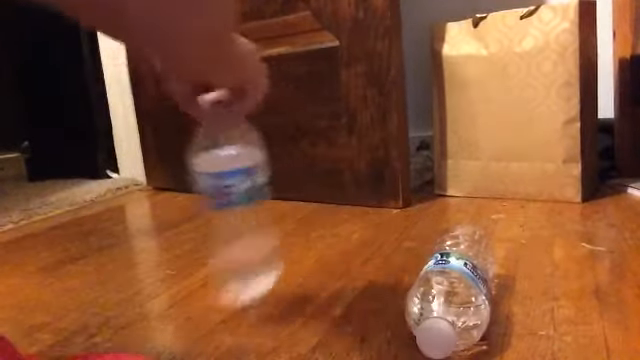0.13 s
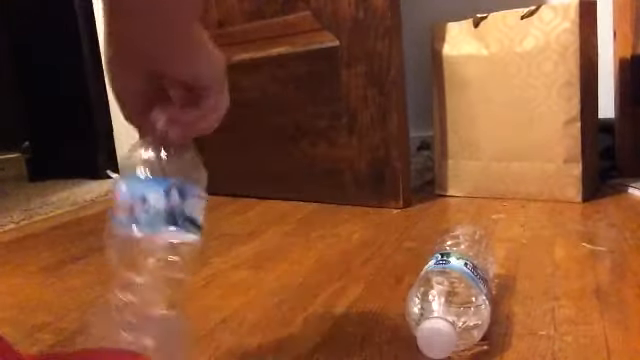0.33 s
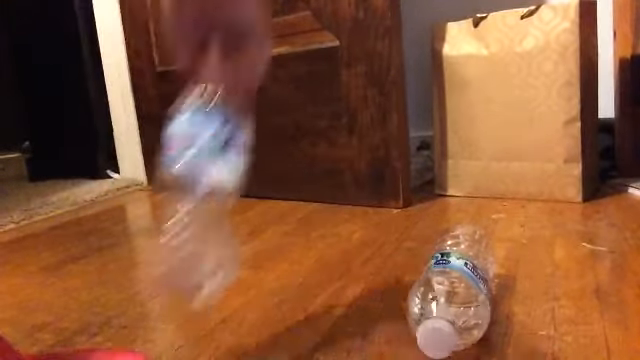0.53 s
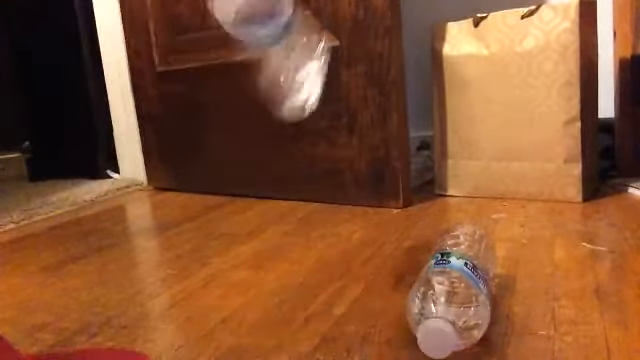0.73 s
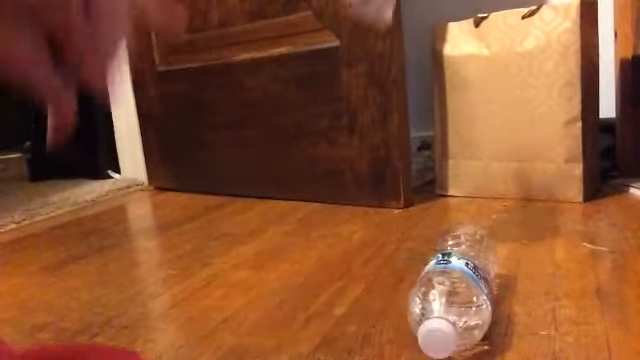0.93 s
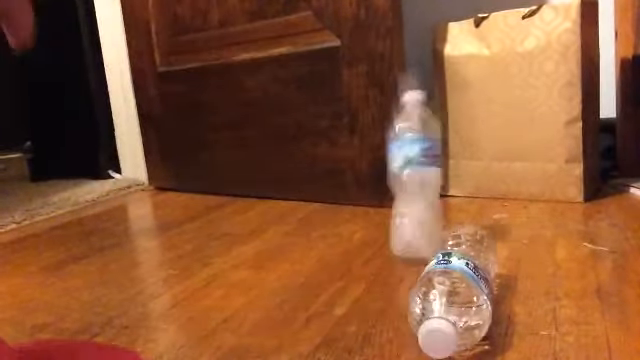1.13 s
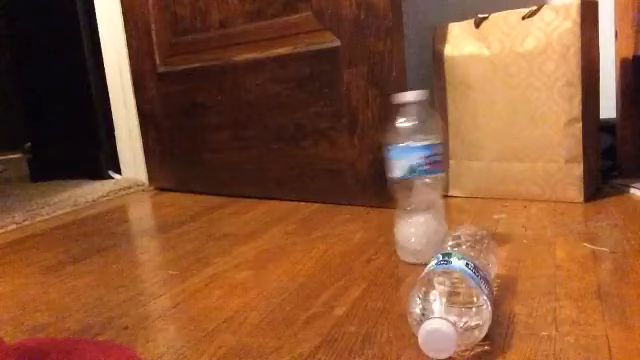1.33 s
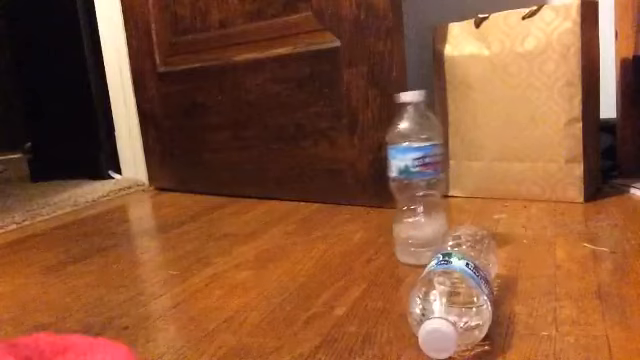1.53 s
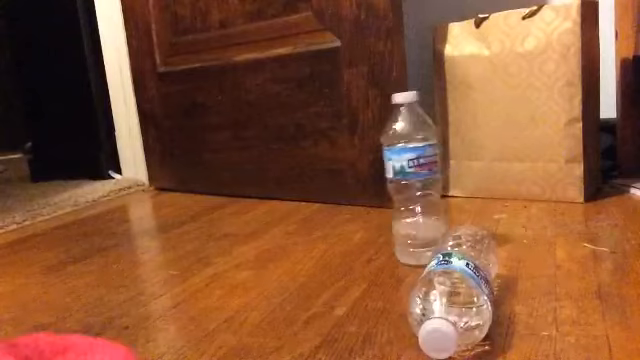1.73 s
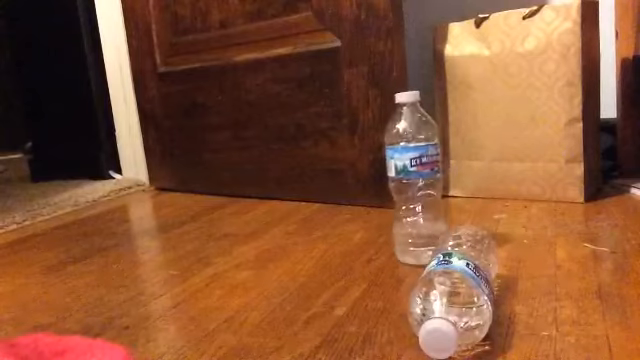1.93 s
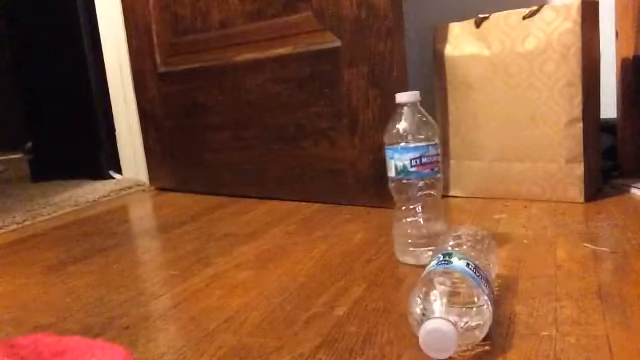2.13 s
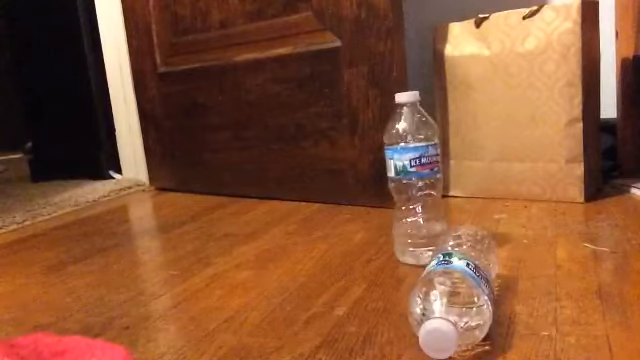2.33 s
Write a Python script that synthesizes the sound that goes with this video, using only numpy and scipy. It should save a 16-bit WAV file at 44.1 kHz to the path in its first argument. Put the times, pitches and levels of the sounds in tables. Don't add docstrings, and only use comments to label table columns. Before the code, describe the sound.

Sharp woody knock of a flipped water bottle landing on floorboards, with faint sloshing around it

```python
import sys
import numpy as np
from scipy import signal
from scipy.io import wavfile

SR = 44100
rng = np.random.default_rng(int(sys.argv[2]) if len(sys.argv) > 2 else 0)


def waveform_to_disk(signal):
    frames = np.transpose(np.atleast_2d(signal))
    scaled = np.clip(frames, -1, 1) * 32767
    samples = np.round(scaled).astype(np.int16)
    wavfile.write(sys.argv[1], SR, samples)


def gain_from_db(level_db):
    decades = np.asarray(level_db, float) / 20
    return 10 ** decades


N = 104384
T = np.arange(N) / SR

# t/s, level/dB
BASE_TOUCHES = [
    (1.1478, -22.5),
    (1.1494, -9),
    (1.1522, -9),
    (1.1552, -9.5),
    (1.1613, -16.5),
]
# t/s, level/dB
WEIGHT_PUSHES = [
    (1.1481, -27.5),
    (1.1503, -14),
    (1.1552, -28),
    (1.1602, -25),
    (1.183, -34),
    (1.212, -40.5),
]
# f/Hz, level/dB, t60/s
BOARD_MODES = [(54.6, -27.5, 0.14), (88, -18, 0.2), (100, -18, .16), (139, -15, .2), (173, -.5, .075),
               (206.5, -1.5, .07), (273, -8, 0.077), (321, -7, 0.07), (405, -12, .06), (452, -7, 0.08),
               (740, 2.5, .04), (774, -11, .17), (790, 10.5, 0.035), (996, -6, .06)]
# f/Hz, level/dB, t60/s
WALL_MODES = [(880, -6, 0.032), (1056, -16, 0.04), (1160, -13, .03), (1255, -5, 0.035), (1422, -14, 0.07),
              (1497, -12.5, .05), (1886, -12, 0.05), (2137, -9.5, 0.034), (2330, -11, 0.017),
              (2680, -10, 0.031), (3080, -7.5, 0.041), (3126, -8, .06), (3590, -11.5, 0.019),
              (4190, -19, 0.036), (4750, -10, 0.0031)]
# f/Hz, density level/dB per Hz
CRUNCH_SPECTRUM = [(650, -31.5), (1100, -8), (2350, -6.5), (3140, -6.5), (8000, -14), (11300, -22),
                   (14100, -25.5), (15800, -34.5)]
# f/Hz, density level/dB per Hz
ECHO_SPECTRUM = [(29, -43.5), (50, -8), (151, -5.5), (513, -22), (753, -12), (1080, -21.5), (3030, -20),
                 (12800, -32), (15500, -43.5)]
# f/Hz, t60/s
ECHO_DECAY = [(60, 0.27), (150, 0.33), (400, 0.17), (1000, 0.15), (3000, 0.2), (8000, .15), (14000, 0.088)]
# t/s, length/s, level/dB, centre f/Hz
WATER_SLAPS = [(0.717, 0.016, -74, 2800), (0.734, 0.017, -68.5, 3650), (0.756, 0.006, -63.5, 4060),
               (0.763, 0.01, -59.5, 2930), (0.767, 0.073, -74.5, 2760), (0.962, 0.04, -69, 6130),
               (.975, 0.034, -70.5, 4600), (.99, 0.058, -73, 8000), (1.038, 0.05, -76, 9000),
               (0.899, 0.011, -75.5, 5500), (1.041, 0.015, -69, 3500), (1.057, 0.009, -69.5, 2800),
               (1.062, 0.053, -70, 1870), (1.119, 0.032, -66, 1820), (1.367, 0.017, -70.5, 3780),
               (1.386, 0.0053, -75, 5450), (1.53, 0.009, -72.5, 6300), (2.066, .012, -77, 3500),
               (1.595, 0.0061, -73.5, 4020), (0.544, 0.0057, -71, 5000)]
# t/s, peak level/dB, f/Hz
SINGLE_DROPS = [(0.548, -57, 4110), (.738, -58, 3700), (0.7574, -61, 4500), (0.7682, -44, 4230),
                (0.7695, -45, 2880), (.7688, -56, 1920), (0.7715, -45.5, 3100), (0.781, -55.5, 4200),
                (.792, -70, 4600), (.848, -57, 10600), (0.876, -58, 8250), (.928, -62, 1430),
                (.9285, -62, 2200), (.932, -55, 3520), (.9325, -57, 13980), (.981, -58, 7600),
                (0.9842, -57, 5100), (1.049, -57, 3300), (1.0505, -55, 5800), (1.128, -55, 3000),
                (0.977, -55, 4960), (0.985, -55, 3180), (0.998, -57, 3330), (1.019, -57, 9500),
                (1.051, -53.5, 7600), (1.06, -50.5, 3200), (1.076, -46, 6130), (1.088, -61, 5030),
                (1.203, -40, 3100), (1.278, -54.5, 3300), (1.303, -52, 3180), (1.311, -56, 6500),
                (1.366, -56, 4300), (1.369, -58, 3290), (1.379, -62, 3500), (1.4, -61, 2770),
                (1.535, -56, 7010), (1.589, -66.5, 1500), (1.695, -69, 2620), (1.835, -65, 2705),
                (1.9, -66, 3492), (1.957, -63, 2672), (2.069, -64, 2720), (2.22, -63.5, 9000)]
# t/s, level/dB, f/Hz
AIR_GLUGS = [(.731, -60.5, 400), (0.752, -53, 381), (.759, -53, 323), (0.7709, -45.5, 349),
             (.785, -55.5, 200), (0.807, -60, 420), (0.828, -64, 321), (.815, -57, 320), (.86, -64, 341),
             (1.043, -59.5, 247), (1.053, -60.5, 777), (1.138, -42, 307.7), (1.44, -63.5, 522.4),
             (1.52, -58, 164.7), (1.511, -59, 430), (1.5, -54.5, 277), (1.586, -57, 298.6),
             (1.592, -60, 479.6), (1.69, -59, 150), (1.722, -58.5, 440), (1.725, -59.5, 278),
             (1.728, -63, 593), (1.815, -61.5, 260), (1.809, -63.5, 443), (1.86, -64.5, 229),
             (1.871, -64.5, 450), (1.91, -64.5, 450), (1.95, -60.5, 181.5), (2.079, -67, 309),
             (2.286, -63.5, 320)]
# t/s, f/Hz, level/dB
SWAY_TRACK = [(0, 599.3, -74), (.25, 579.8, -72), (.31, 516.4, -81), (.45, 501, -100)]
# frequency ratio/1, level/dB
SWAY_PARTIALS = [(.53, -1.5), (.74, -4.5), (1.0, 0.5), (1.75, -7.5)]
# t/s, f/Hz, level/dB
SWING_TRACK = [(.27, 560, -90), (.32, 680, -84), (.36, 860, -82), (.42, 970, -85.5), (.48, 670, -82.5),
               (.53, 740, -80.5), (.6, 950, -87), (.65, 760, -85.5), (.76, 720, -79)]
# t/s, f/Hz, level/dB
ROCKING_TRACK = [(1.6, 600, -95), (1.68, 680, -85), (1.79, 920, -83), (1.94, 1059, -83.5),
                 (1.98, 859.5, -77), (2.039, 680, -83.5), (2.12, 800, -89), (2.22, 1230, -84.5),
                 (2.37, 1355, -86)]
# f/Hz, density level/dB per Hz
FROTH_SPECTRUM = [(180, -45.5), (300, -6.5), (354, -5.5), (446, -1), (835, -8), (3180, -9), (15500, -29.5)]
# f/Hz, density level/dB per Hz
RUMBLE_SPECTRUM = [(12, -47), (20, -17.5), (81, 2.5), (174, -3), (332, -10), (449, -13), (549, -20.5),
                   (672, -18.5), (2500, -38), (3250, -69), (5500, -120)]
# t/s, level/dB
RUMBLE_TRACK = [(0, -67.5), (.31, -66.5), (0.5, -69.5), (.64, -70.5), (.8, -66), (1.1, -69.5), (1.3, -63),
                (1.45, -63), (1.548, -66), (1.75, -66.5), (1.94, -67), (2.37, -69.5)]
# f/Hz, density level/dB per Hz
HISS_SPECTRUM = [(880, -28), (1500, -2.5), (2590, -3.5), (4020, -4.5), (11000, -8), (15500, -16.5)]


def rms_one(x):
    return x / np.sqrt(np.mean(x ** 2) + 1e-20)


def at_hz(points, hz):
    table_hz, values = np.array(points).T[:2]
    return np.interp(np.log(hz), np.log(table_hz), values)


def drift(rate):
    hop = 40
    r = np.exp(-2 * np.pi * rate * hop / SR)
    noise = rng.standard_normal(N // hop + 2002)
    slow = signal.lfilter([1], [1, -2 * r, r * r], noise)[2000:]
    return np.interp(np.arange(N) / hop, np.arange(len(slow)), rms_one(slow))


def ring(clicks, hz, t60):
    r = gain_from_db(-60 / (t60 * SR))
    w = 2 * np.pi * hz / SR
    return signal.lfilter([0, np.sin(w)], [1, -2 * r * np.cos(w), r * r], clicks + 1e-18)


def clicks_at(s, db):
    out = np.zeros(N)
    out[(np.atleast_1d(s) * SR).astype(int)] = gain_from_db(db)
    return out


def swell(start, rise, hold, t60):
    attack = np.clip((T - start) / rise, 0, 1)
    return attack * gain_from_db(-60 * np.maximum(T - start - rise - hold, 0) / t60)


def grains(rate, spread_db):
    sizes = gain_from_db(spread_db * np.minimum(rng.exponential(1, N), 4)) * rng.choice([-1, 1], N)
    return rms_one(sizes * (rng.random(N) < rate / SR))


def banded(spectrum, white, patchy_db, shape=lambda hz: 1):
    edges = 25 * 2 ** np.arange(0, 9.4, 1 / 3)
    edges = edges[(edges > spectrum[0][0] * .9) & (edges < spectrum[-1][0] * 1.2)]
    out, power = 0, 0
    for k, (low, high) in enumerate(zip(edges, edges[1:])):
        hz = np.sqrt(low * high)
        band_pass = signal.butter(2, [low, high], "band", fs=SR, output="sos")
        band = signal.sosfilt(band_pass, white[k % 2])
        gain = gain_from_db(at_hz(spectrum, hz))
        flicker = gain_from_db(patchy_db * drift(14))
        out = out + gain * flicker * band * shape(hz)
        power += gain ** 2 * (high - low) / (SR / 2)
    return out / np.sqrt(power)


def boards():
    push = signal.lfilter(*signal.butter(2, 426, fs=SR), clicks_at(*np.transpose(WEIGHT_PUSHES)))
    return sum(gain_from_db(db) * ring(push, hz, t60) for hz, db, t60 in BOARD_MODES)


def wall():
    s, db = np.transpose(BASE_TOUCHES)
    out = np.zeros(N)
    for hz, mode_db, t60 in WALL_MODES:
        uneven_db = 2.5 * rng.normal(0, 1, len(s))
        out += ring(clicks_at(s, db + mode_db - 8 + uneven_db), hz, t60)
    return out


def crunch():
    grit = [grains(8300, 1.3), grains(8300, 0.99)]
    burst = swell(1.1478, rise=.004, hold=.008, t60=0.021)
    return gain_from_db(-22) * burst * banded(CRUNCH_SPECTRUM, grit, patchy_db=0.55)


def landing():
    gap_hz, gap_width_hz, gap_depth = 608, 110, 0.42
    high_pass = signal.butter(4, 80, "high", fs=SR, output="sos")
    struck = signal.sosfilt(high_pass, boards() + wall())
    gap = signal.lfilter(*signal.iirpeak(gap_hz, gap_hz / gap_width_hz, fs=SR), struck)
    return struck - gap_depth * gap + crunch()


def room_echo():
    def dying(hz):
        return swell(1.152, rise=0.014, hold=0.01, t60=at_hz(ECHO_DECAY, hz))

    reflections = [grains(7000, 2.5), grains(7000, 2.5)]
    return gain_from_db(-31.5) * banded(ECHO_SPECTRUM, reflections, patchy_db=0.73, shape=dying)


def drops():
    out = np.zeros(N)
    noise = signal.lfilter(*signal.butter(1, 1500, "high", fs=SR), rng.standard_normal(N))
    for s, peak_db, hz in SINGLE_DROPS:
        db = peak_db - 3
        out += ring(clicks_at(s, db), hz, t60=45 / hz)
        snap = gain_from_db(db - 6) * noise * swell(s, 0.00027, 0, 0.0069)
        snap_top_hz = min(1.6 * hz, 15000)
        out += signal.lfilter(*signal.butter(1, snap_top_hz, fs=SR), snap)
    return out


def glugs():
    out, noise = np.zeros(N), rng.standard_normal(N)
    for s, db, hz in AIR_GLUGS:
        turbulence = gain_from_db(db - 22.0) * noise * swell(s, 0.0011, 0, 0.012)
        stir = clicks_at(s, db + 3.0) + turbulence
        rung = ring(stir, hz, t60=23 / hz)
        out += signal.lfilter(*signal.butter(1, 0.78 * hz, fs=SR), rung)
    return out


def slaps():
    octaves, skirt, cycles = .6, gain_from_db(-13.5), 17
    spray = grains(9900, 2.5)
    pitches = np.geomspace(600, 14000, 24)
    dealt = rng.integers(0, 24, N)
    shapes = [gain_from_db(db) * swell(s, 0.24 * length, 0.41 * length, .04) for s, length, db, _ in WATER_SLAPS]
    out = np.zeros(N)
    for k, hz in enumerate(pitches):
        near = [np.exp(-.5 * (np.log2(hz / centre) / octaves) ** 2) + skirt
                for _, _, _, centre in WATER_SLAPS]
        droplets = rms_one(ring(spray * (dealt == k), hz, cycles / hz))
        out += np.dot(near, shapes) * droplets / 3
    return out


def hollow(track, partials, width):
    s, hz, db = np.transpose(track)
    phase = 2 * np.pi * np.cumsum(np.interp(T, s, hz)) / SR
    lines = 0
    for ratio, line_db in partials:
        line = drift(width) * np.cos(ratio * phase) + drift(width) * np.sin(ratio * phase)
        lines = lines + gain_from_db(line_db) * line
    return gain_from_db(np.interp(T, s, db, right=-120)) * lines


def bottle_air():
    sway = hollow(SWAY_TRACK, SWAY_PARTIALS, width=45)
    single = [(0.97, 0.0039)]
    return sway + hollow(SWING_TRACK, single, width=62) + hollow(ROCKING_TRACK, single, width=62)


def froth():
    fizz = [grains(2200, 3.5), grains(2200, 3.5)]
    fading = swell(1.17, rise=0.065, hold=0, t60=0.694)
    return gain_from_db(-59.5) * fading * banded(FROTH_SPECTRUM, fizz, patchy_db=2.5)


def house():
    s, db = np.transpose(RUMBLE_TRACK)
    rumble = banded(RUMBLE_SPECTRUM, rng.standard_normal((2, N)), patchy_db=1.5)
    hiss = banded(HISS_SPECTRUM, rng.standard_normal((2, N)), patchy_db=0.58)
    return gain_from_db(np.interp(T, s, db)) * rumble + gain_from_db(-80) * hiss


def scene():
    air = bottle_air()
    impact = landing() + room_echo()
    water = froth() + slaps() + drops() + glugs()
    return (air + impact + water + house())[None, :]


def band_limit(x):
    return signal.sosfilt(signal.butter(12, 16130, fs=SR, output="sos"), x)


def record(dry):
    overload = 0.9
    rounded = overload * np.tanh(dry / overload)
    low_pass = signal.cheby2(10, 60, 16300, fs=SR, output="sos")
    mix = signal.sosfilt(low_pass, rounded)
    return band_limit(mix)


dry = scene()
out = record(dry)
waveform_to_disk(out)
```